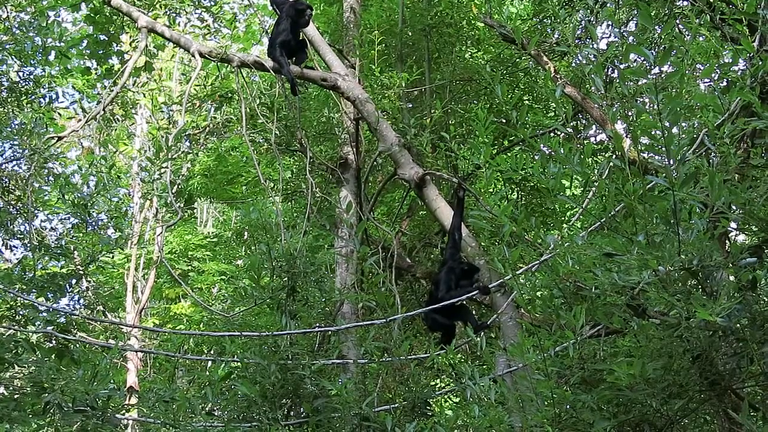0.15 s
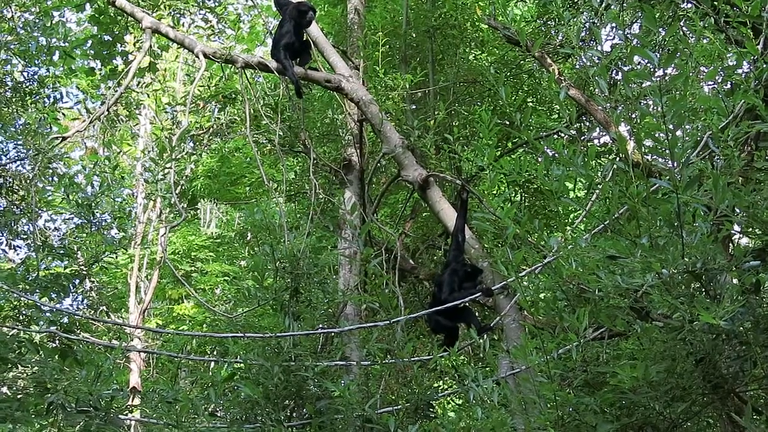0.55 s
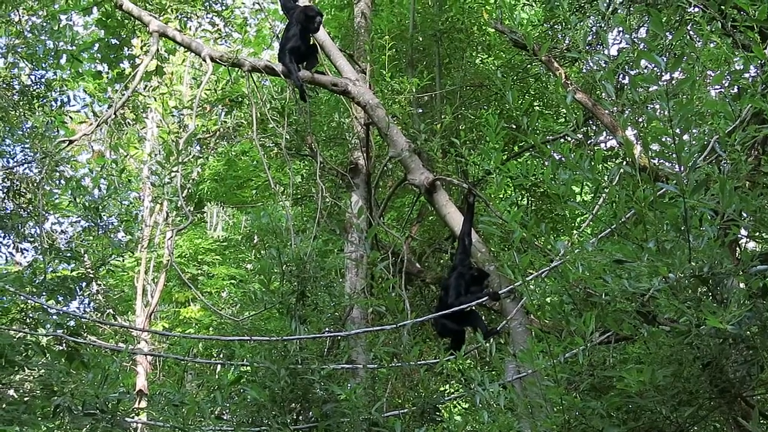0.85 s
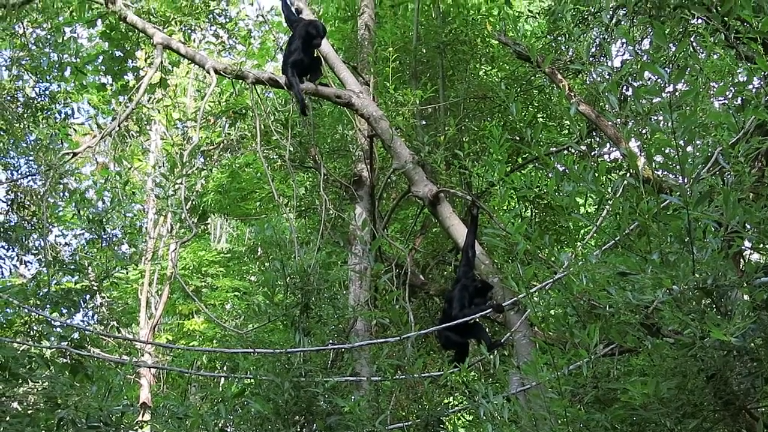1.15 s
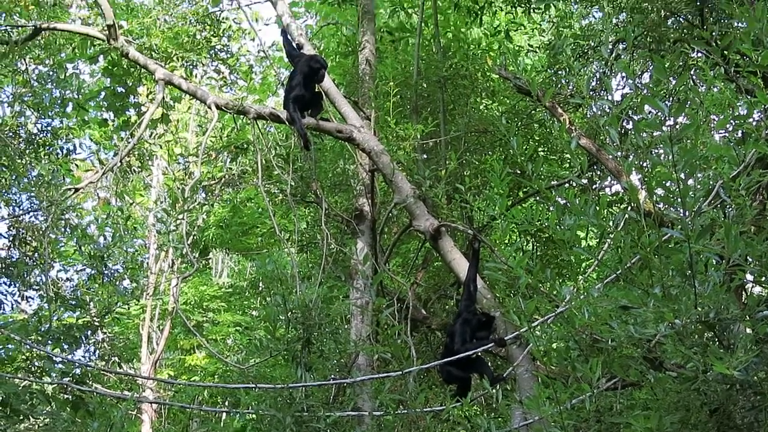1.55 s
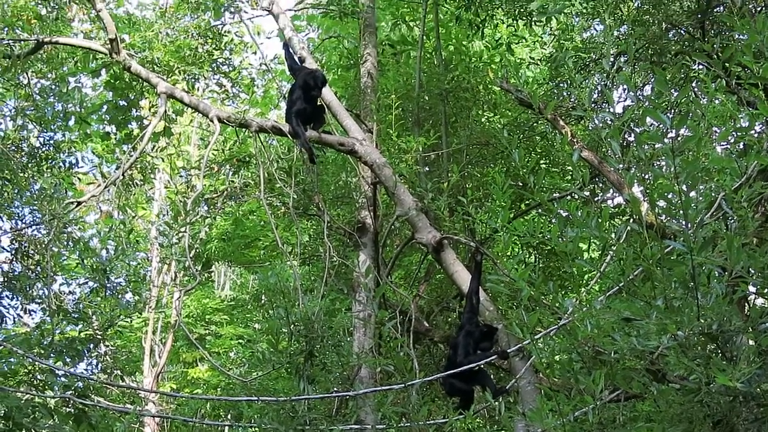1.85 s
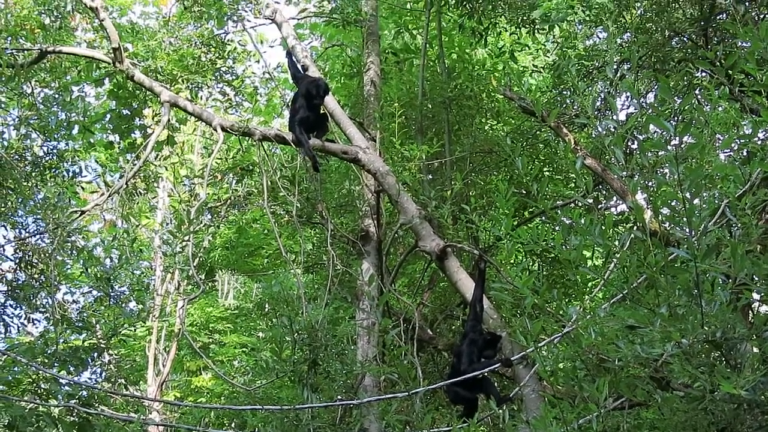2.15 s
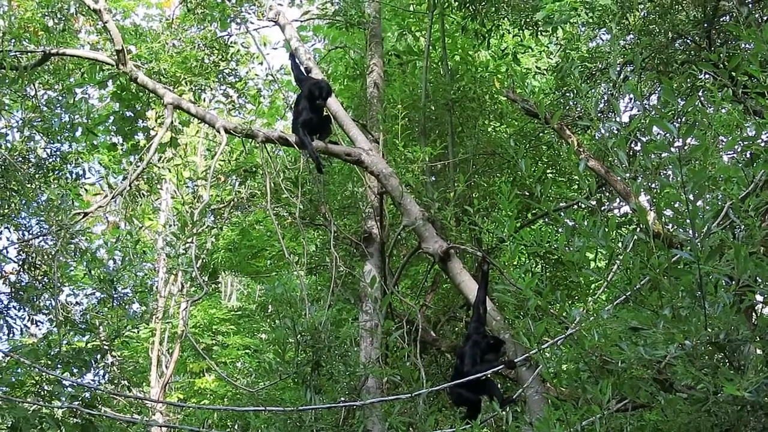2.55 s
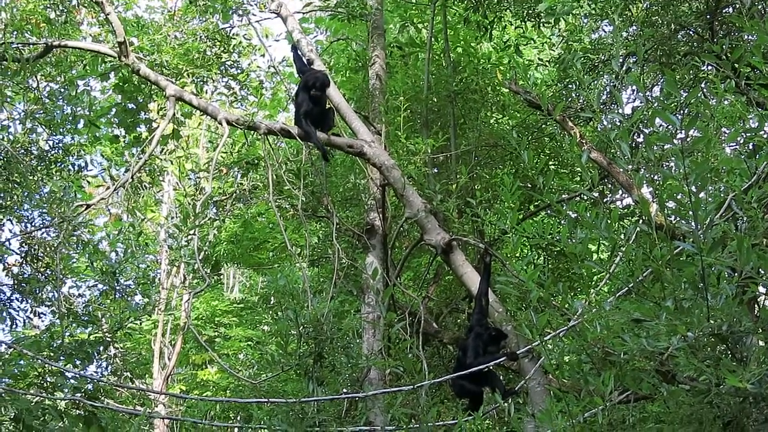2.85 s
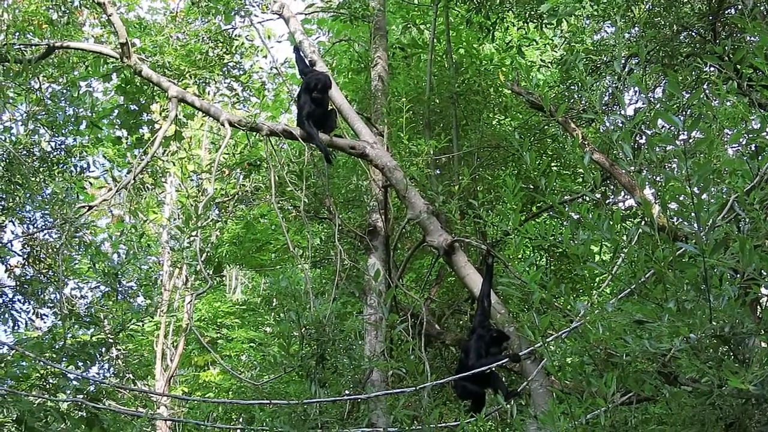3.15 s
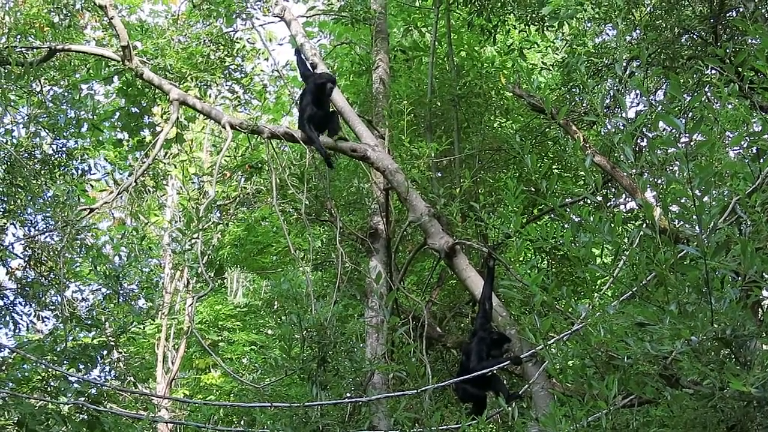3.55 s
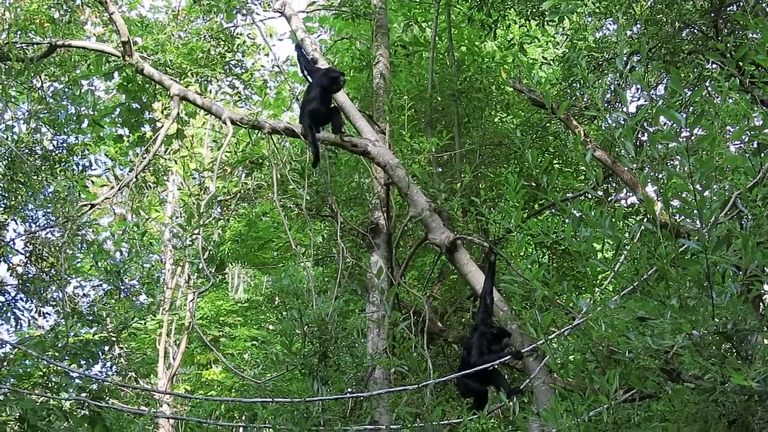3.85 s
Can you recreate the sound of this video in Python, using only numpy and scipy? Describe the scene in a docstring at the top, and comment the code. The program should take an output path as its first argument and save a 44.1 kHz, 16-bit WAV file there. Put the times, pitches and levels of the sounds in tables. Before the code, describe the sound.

Two apes give brief barking hoots and low throat booms, spaced apart in a reverberant forest

```python
"""Two siamangs call in a forest: soft, nearly pure booms into the throat sac and short barks.
A bark is a harmonic stack on a pitch that arches up and falls, shaped by throat, mouth and rasp;
the apes often answer on each other's heels. Trunks and branches scatter the calls into a
noise tail and return one dull echo, over faint filtered-noise hiss and rumble of varying level."""
import sys
import numpy as np
from scipy import signal
from scipy.fft import rfft, irfft
from scipy.io import wavfile
from scipy.ndimage import map_coordinates

SR = 44100
rng = np.random.default_rng(int(sys.argv[2]) if len(sys.argv) > 2 else 0)


def master_out(mix):
    """Clip the mix to full scale and print it as 16-bit PCM to the path in sys.argv[1]."""
    frames = np.transpose(np.atleast_2d(mix))
    ceiling = np.clip(frames, -1, 1)
    pcm = np.round(ceiling * 32767).astype(np.int16)
    wavfile.write(sys.argv[1], SR, pcm)


N = 176400
CALL_SAMPLES = SR // 8  # buffer of one boom or bark
LEAD_S = 0.027  # a bark's voice starts this long before its pitch top


def undb(db):
    """Decibels to amplitude gain."""
    return 10 ** (np.asarray(db) / 20)


def at_hz(table, hz, axis=1):
    """Interpolate a table column over log frequency."""
    rows = np.array(table, float)
    return np.interp(np.log(np.maximum(hz, 1)), np.log(rows[:, 0]), rows[:, axis])


def colour(x, table):
    """Filter a sound by a (frequency [Hz], gain [dB]) table."""
    size = x.shape[-1]
    gain = undb(at_hz(table, np.fft.rfftfreq(size, 1 / SR)))
    return irfft(rfft(x) * gain, size)


def wobble(size, rate_hz):
    """Smooth random curve through unit-variance points, rate_hz of them per second."""
    points = rng.standard_normal(int(size * rate_hz / SR) + 4)
    position = 1 + np.arange(size) * rate_hz / SR
    return map_coordinates(points, [position], order=3, mode="mirror")


def ramp(u):
    """Smooth step from 0 to 1."""
    return np.sin(np.pi / 2 * np.clip(u, 0, 1)) ** 2


def add(out, x, start_s):
    """Mix a sound in at a time."""
    out += map_coordinates(x, [np.arange(N) - round(start_s * SR)], order=0)


def stereo_noise(size, side):
    """White mid noise in both ears plus a coloured difference of opposite sign."""
    mid, difference = rng.standard_normal((2, size))
    return mid + np.array([[1], [-1]]) * colour(difference, side)


def bands(size):
    """Overlapping half-octave bands that sum to one: (centre [Hz], weights)."""
    octave = np.log2(np.maximum(np.fft.rfftfreq(size, 1 / SR), 1))
    centres = np.arange(4, 14.6, 0.5)
    return [(2 ** c, np.maximum(1 - 2 * abs(octave - c), 0)) for c in centres]


def boom(length_s, middle_hz, glide_hz_per_s, db, swell_db_per_s):
    """Throat-sac tone with weak overtones; pitch glides and level changes steadily in dB."""
    # harmonics 2 to 4: level re fundamental [dB]
    overtones_db = [-25.5, -35.5, -32]
    attack_s, release_s = 0.021, 0.021
    t = np.arange(CALL_SAMPLES) / SR
    from_middle = t - length_s / 2
    hz = (middle_hz + glide_hz_per_s * from_middle) * (1 + 0.011 * wobble(CALL_SAMPLES, 120))
    phase = 2 * np.pi * np.cumsum(hz) / SR
    tone = np.sin(phase)
    for k, overtone_db in enumerate(overtones_db, 2):
        tone = tone + undb(overtone_db) * np.sin(k * phase)
    envelope = ramp(t / attack_s) * ramp((length_s - t) / release_s)
    return tone * undb(db + swell_db_per_s * from_middle) * envelope


def bark(caller, top_hz, fall_s, db, press_at_s, second_db, treble_db, mouth_hz, mouth_db, rough):
    """Harmonics on an arching pitch pass through throat and mouth; rasp blurs the upper ones."""
    # throat response by caller: (frequency [Hz], gain [dB])
    throat = { "deep": [(480, -8), (600, 1.5), (1050, -11.5), (1230, -14.5), (1800, -25.5), (2450, -27),
              (3050, -29.5), (3700, -34.5), (4400, -45), (5200, -48), (7000, -45.5), (10000, -60),
              (15000, -67)], "sharp": [(480, -1.5), (560, 0), (650, -0.5), (950, -8.5), (1050, -4),
              (1150, -12.5), (1300, -7), (1850, -26.5), (2500, -21), (3100, -23), (4000, -24.5),
              (5200, -31.5), (7500, -38), (10000, -45.5), (15000, -53)]}
    # by caller: attack [s]
    attack_s = {"deep": .019, "sharp": 0.024}
    # sac hum an octave under the bark, by caller: level [dB]
    sac_db = {"deep": -20.5, "sharp": -33}
    release_s = 0.024
    arch_depth, arch_rise_s, arch_fall_s = 0.36, 0.030, 0.046  # depth: share of top pitch
    press_rise_s, press_fall_s, slack_db = 0.022, 0.018, -11  # slack: harmonics 3+ when unpressed
    mouth_octaves = 0.24  # Gaussian width, each side
    jitter, rasp, rasp_exponent, rasp_hz = 0.014, 0.46, 1, 329.7

    t = np.arange(CALL_SAMPLES) / SR - LEAD_S  # 0 at the pitch top
    arch = 1 - np.exp(-(t / np.where(t < 0, arch_rise_s, arch_fall_s)) ** 2)
    hz = top_hz * (1 - arch_depth * arch) * (1 + jitter * rough * wobble(CALL_SAMPLES, 500))
    phase = 2 * np.pi * np.cumsum(hz) / SR
    from_press = t - press_at_s
    press = np.exp(-(from_press / np.where(from_press < 0, press_rise_s, press_fall_s)) ** 2)

    voice = undb(sac_db[caller]) * np.sin(phase / 2)
    for k in range(1, 25):
        blur = min(rasp * rough * (k / 2) ** rasp_exponent, 2)
        if k == 1:
            blur *= 0.5
        unsteady = wobble(CALL_SAMPLES, rasp_hz) + 1j * wobble(CALL_SAMPLES, rasp_hz)
        grain = (1 + blur * unsteady) / np.sqrt(1 + 2 * blur ** 2)  # keeps mean power
        if k == 1:
            effort_db = 0
        elif k == 2:
            effort_db = second_db * press
        else:
            effort_db = treble_db + slack_db * (1 - press)
        lift_db = mouth_db * np.exp(-(np.log2(k * hz / mouth_hz) / mouth_octaves) ** 2)
        gain = undb(at_hz(throat[caller], k * hz) + effort_db + lift_db)
        voice = voice + gain * np.real(grain * np.exp(1j * k * phase))
    envelope = ramp((t + LEAD_S) / attack_s[caller]) * ramp((fall_s - t) / release_s + 0.5)
    return undb(db) * voice * envelope


def air():
    """Forest hiss over low rumble: filtered noise, each band wavering a little."""
    # spectral shape: (frequency [Hz], relative density [dB])
    air_spectrum = [(15, -48.5), (25, -15.5), (77, -1), (212, -12), (247, -5), (311, -6.5), (456, -4),
                    (545, -5.5), (588, -3.5), (798, -3.5), (979, -11.5), (1140, -8), (1670, -12),
                    (1900, -13), (5530, -23), (11000, -34), (14300, -79), (22000, -120)]
    # (frequency [Hz], side re mid [dB])
    air_side = [(60, -30.5), (200, -24), (700, -16.5), (1300, -9.5), (2400, -6.5), (4400, -1.5),
                (9000, 3.5)]
    # (frequency [Hz], left minus right [dB])
    air_balance = [(200, -0.5), (700, 2), (1300, 6), (2400, 4.5), (4400, 3.5), (9000, 0.5)]
    # background level re base_db: (time [s], level [dB])
    air_level = [(0, 0.5), (.6, 2.5), (1.45, 3), (2.05, -2), (2.45, 2), (3.049, 1.5), (3.501, 6), (4, 0)]
    base_db, flicker_db, flicker_hz, top_hz = -43.5, 0.93, 8.6, 10900
    noise = rfft(colour(stereo_noise(N, air_side), air_spectrum))
    out = 0
    for hz, band in bands(N):
        lean_db = at_hz(air_balance, hz) * np.array([[0.5], [-0.5]])
        out = out + irfft(noise * band, N) * undb(lean_db + flicker_db * wobble(N, flicker_hz))
    out = signal.sosfilt(signal.butter(12, top_hz, fs=SR, output="sos"), out)
    level_db = base_db + np.interp(np.arange(N) / SR, *np.array(air_level).T)
    return out / np.std(out.mean(axis=0)) * undb(level_db)


def forest(x):
    """Decaying-noise scatter from near branches and far trunks; decay depends on frequency."""
    # far tail: (frequency [Hz], level of whole band response [dB], t60 [s])
    tail = [(150, -18, .7), (276, -12.5, 0.82), (447, -18, 1.05), (640, -13, 1.37), (1120, -4, 0.84),
            (1800, -9.5, 0.95), (2800, -5.5, 0.92), (6000, -5, 0.57), (14000, -13, .25)]
    # (frequency [Hz], side re mid [dB])
    tail_side = [(100, -12.5), (280, -11), (600, -10.5), (1200, -10), (2400, -9), (4400, -3), (9000, -4)]
    onset_s, near_db, near_t60_s = 0.022, 0.5, 0.24  # near_db: start level re far tail
    t = np.arange(SR) / SR
    noise = rfft(stereo_noise(SR, tail_side))
    near = undb(near_db) * np.exp(-np.log(1000) * t / near_t60_s)
    response = 0
    for hz, band in bands(SR):
        far = np.exp(-np.log(1000) * t / at_hz(tail, hz, axis=2))
        fade = (far + near) * ramp(t / onset_s)
        fade = fade / np.sqrt(np.sum(fade ** 2))  # unit energy
        response = response + irfft(noise * band, SR) * fade * undb(at_hz(tail, hz))
    return signal.fftconvolve(x[None], response, axes=1)[:, :N]


def echo(x):
    """One distinct reflection from the trees: delayed and low-passed."""
    delay_s, echo_db, top_hz = 0.088, -18.5, 1500
    dull = signal.sosfilt(signal.butter(2, top_hz, fs=SR, output="sos"), x)
    out = np.zeros(N)
    add(out, undb(echo_db) * dull, delay_s)
    return out


def scene():
    """Both apes a little off centre, reaching the right ear first, in the forest."""
    # (pitch top [s], caller, top pitch [Hz], top to half-amplitude release [s], gain [dB],
    #  hardest press after top [s], 2nd harmonic lift under press [dB], harmonics 3+ lift [dB],
    #  mouth resonance [Hz], its lift [dB], roughness [0-1])
    barks = [ (0.015, "deep", 621.2, 0.04, -7.5, -0.017, 7.5, 7.5, 3370, -1, 0.42),
             (0.101, "sharp", 573.4, .033, -12.5, .002, -0.5, -5, 2850, 5, 0.24),
             (0.244, "sharp", 584, 0.035, -11.5, 0.0071, -1, -4.5, 7650, 5.5, 0.32),
             (0.799, "deep", 612.6, 0.038, -6.5, -0.0096, 0, 3, 1750, 0, 0.18),
             (0.928, "sharp", 643.6, 0.048, -11.5, 0.0012, -2.5, 0, 3270, 7, 0.14),
             (1.657, "sharp", 655.7, 0.047, -12, 0.0015, -0.5, 3.5, 4150, -4.5, 0.42),
             (1.685, "deep", 615, .034, -11, -0.014, 4.5, 3.5, 2030, 7.5, 0.32),
             (2.616, "deep", 614, 0.039, -6, -0.0095, 0.5, 3, 1910, 2.5, 0.23),
             (2.738, "sharp", 653.5, 0.042, -11, 0.0048, -9.5, -2, 2620, 3, 0.37),
             (3.623, "sharp", 664.2, .047, -11, -0.0071, 8, 2.5, 2690, 8.5, 0.22),
             (3.76, "sharp", 598.2, 0.041, -17.5, 0.014, 11, -1.5, 2500, 7, .4),
             (3.796, "deep", 605, 0.038, -8.5, -0.003, 0.5, 2.5, 3300, 3, 0.18),
             (3.891, "sharp", 577.6, 0.036, -13, -0.0011, 2.5, -4, 2950, 7, 0.37)]
    # (start [s], length [s], middle pitch [Hz], glide [Hz/s], level at middle [dB], swell [dB/s])
    booms = [ (-.05, 0.061, 295.2, 292, -5.5, -3), (0.04, 0.068, 248, -2, -30.5, -7),
             (0.165, 0.075, 249, -1, -26.5, -7), (0.699, 0.083, 299.3, 341, -12, 130),
             (0.84, 0.076, 220.6, 9, -23.5, 44), (1.553, 0.087, 219.7, 98, -20.5, 92),
             (1.575, 0.09, 297.9, 411, -12, 92), (2.510, 0.093, 296.4, 397, -13.5, 106),
             (2.649, 0.087, 227, 0, -31.5, -2), (3.533, 0.074, 225.6, -2, -20.5, 30),
             (3.687, 0.043, 255.4, -4, -24, -3), (3.692, 0.084, 296, 340, -17, 84),
             (3.813, 0.072, 243, 0, -31, 0.5), (3.947, .07, 249, 2, -26.5, 13)]
    left_lag_s = 0.000012
    calls = np.zeros(N)
    for top_s, *settings in barks:
        add(calls, bark(*settings), top_s - LEAD_S)
    for start_s, *settings in booms:
        add(calls, boom(*settings), start_s)
    left = map_coordinates(calls, [np.arange(N) - left_lag_s * SR], order=3)
    direct = np.array([left, calls])
    return direct + echo(calls) + forest(calls) + air()


def record(dry):
    """The recorder cuts the top with a steep elliptic low-pass."""
    top_hz, ripple_db, stop_db = 15300, 0.2, 70
    return signal.sosfilt(signal.ellip(8, ripple_db, stop_db, top_hz, fs=SR, output="sos"), dry)


dry = scene()
out = record(dry)
master_out(out)
```